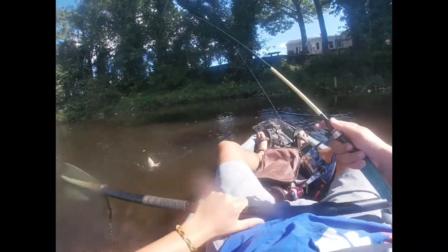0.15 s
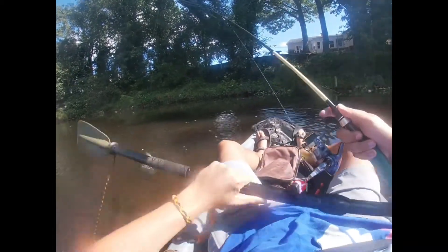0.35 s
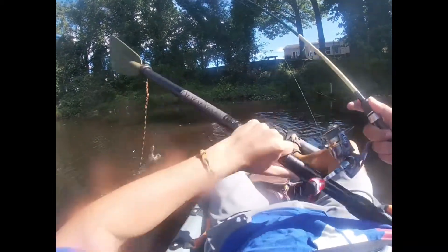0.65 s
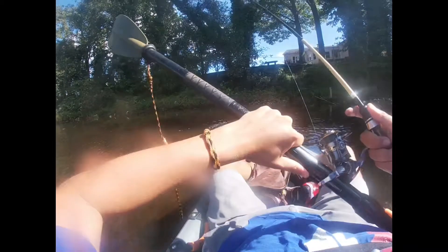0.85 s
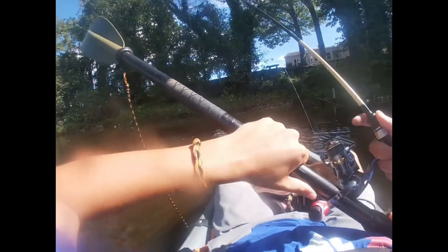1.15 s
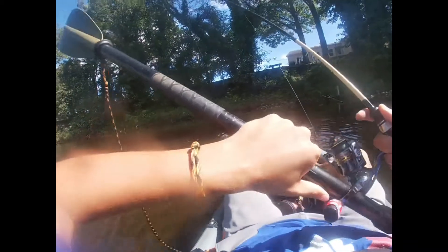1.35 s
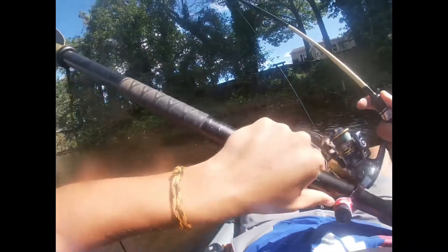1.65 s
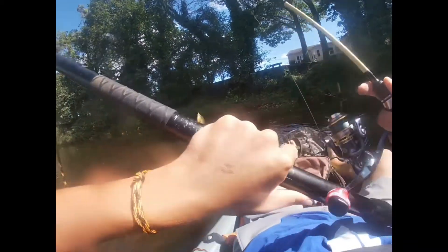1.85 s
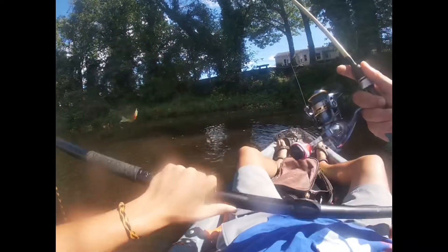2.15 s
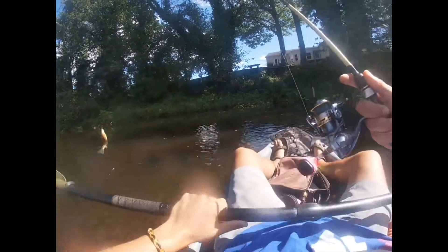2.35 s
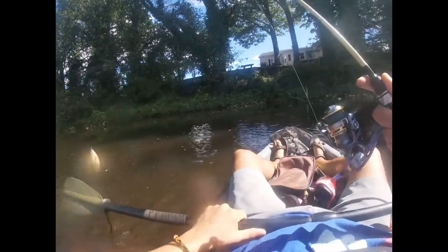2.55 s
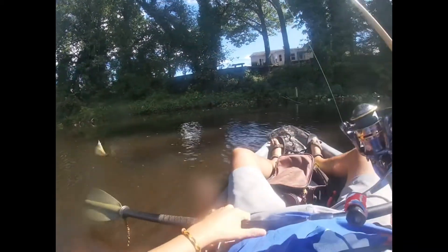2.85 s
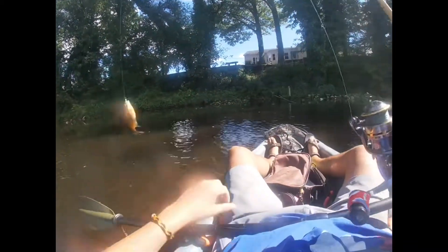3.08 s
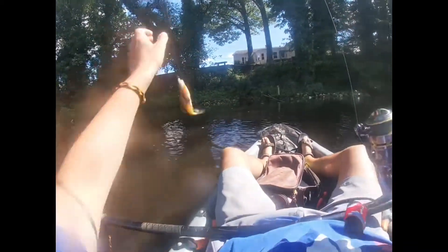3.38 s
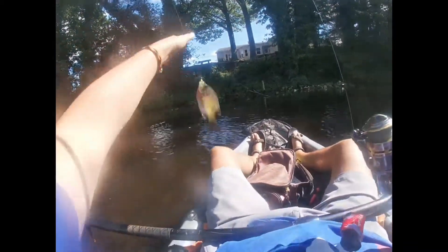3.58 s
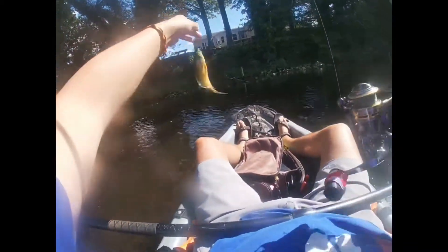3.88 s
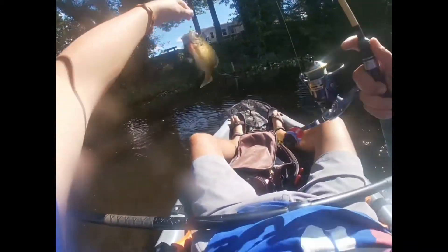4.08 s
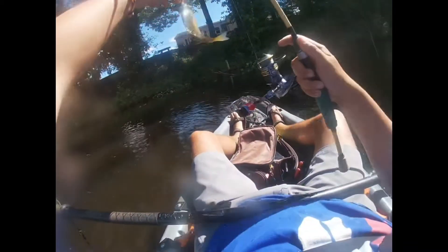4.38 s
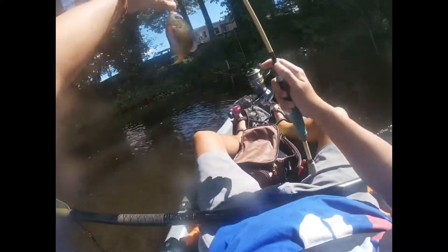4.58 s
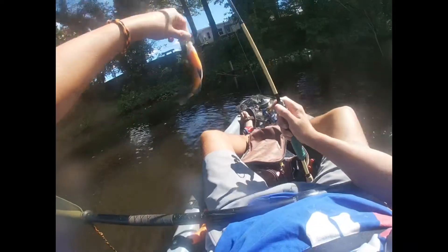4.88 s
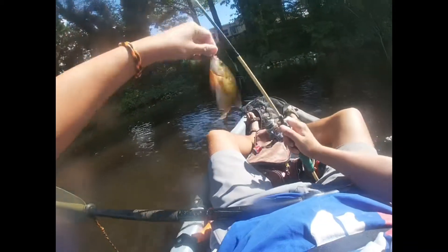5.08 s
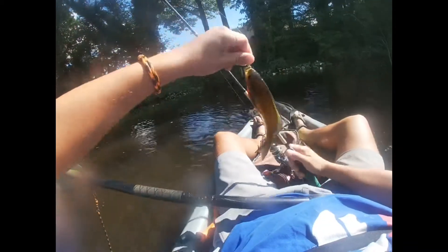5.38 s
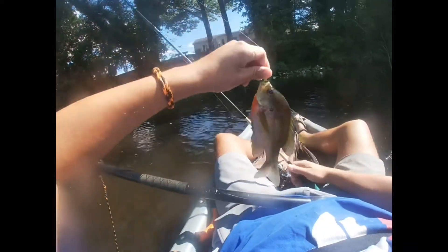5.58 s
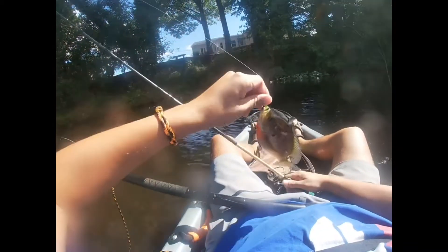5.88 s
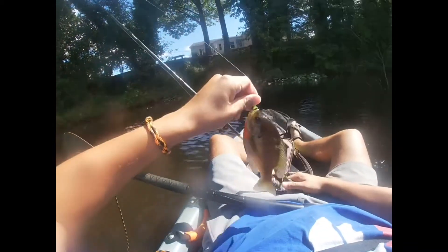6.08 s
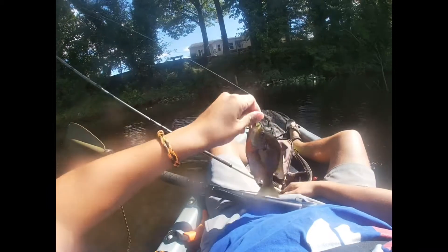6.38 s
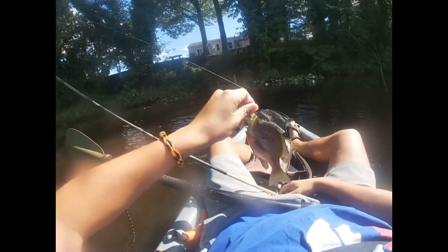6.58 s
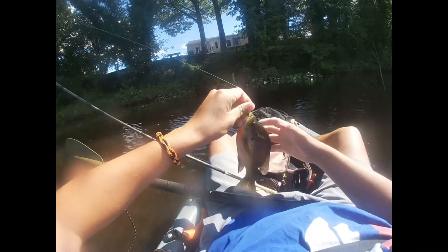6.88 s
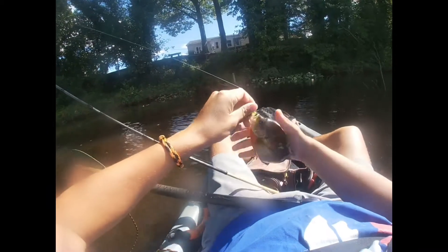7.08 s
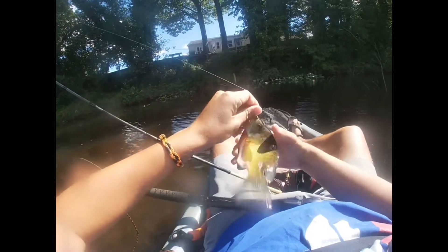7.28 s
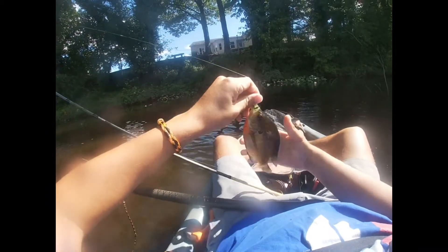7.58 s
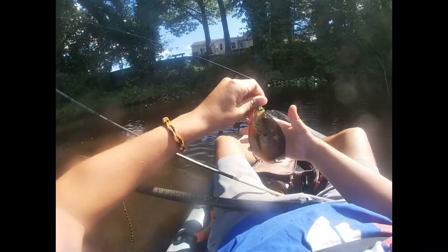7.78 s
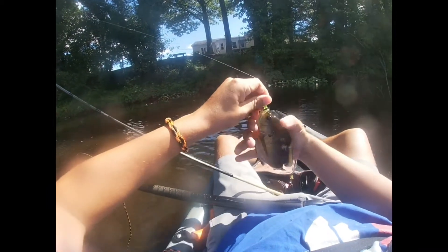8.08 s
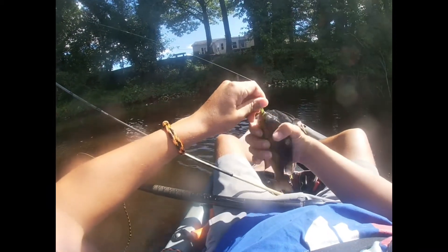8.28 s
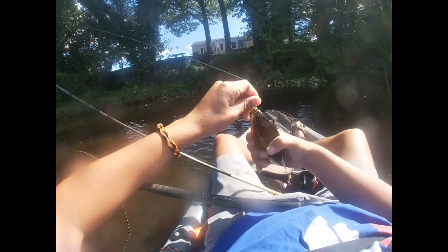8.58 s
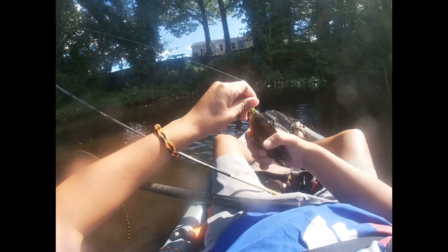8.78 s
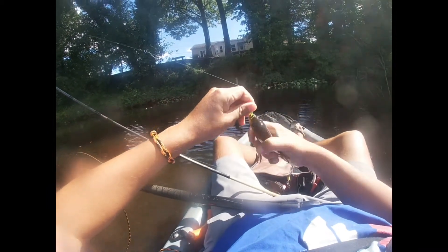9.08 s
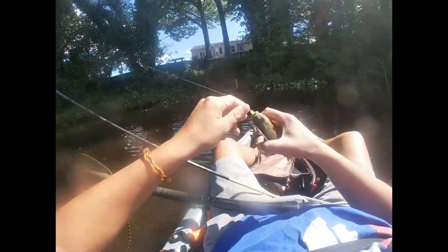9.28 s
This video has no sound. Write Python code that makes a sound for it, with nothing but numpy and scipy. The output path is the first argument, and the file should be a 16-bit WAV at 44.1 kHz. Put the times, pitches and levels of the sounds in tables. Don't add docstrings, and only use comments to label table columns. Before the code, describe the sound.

A kayak on a calm river, heard through one muffled microphone. Soft thumps, a sharp clicking of reel gear and small drips lead to a violent burst of scraping, thudding and low mount rumble near two seconds. Cloth rustles and nicks patter past three seconds and thin out; a rod creaks briefly, a wet slither and a few ticks follow over soft air, distant crickets and a faint electronic ticking hiss.

```python
import sys
import numpy as np
from scipy import signal
from scipy.fft import rfft, irfft, next_fast_len
from scipy.io import wavfile
from scipy.ndimage import uniform_filter1d

SR = 44100
rng = np.random.default_rng(int(sys.argv[2]) if len(sys.argv) > 2 else 0)


def field_ratio(decibels):
    return 10 ** (np.asarray(decibels, dtype=float) / 20)


def master(y):
    cut = np.clip(np.atleast_2d(y).T, -1, 1)
    pcm = np.round(cut * 32767)
    wavfile.write(sys.argv[1], SR, pcm.astype(np.int16))


N = 416304


def noise():
    return rng.standard_normal(N)


def clock(seconds):
    return np.arange(int(seconds * SR)) / SR


def rms_one(x):
    return x / np.sqrt(np.mean(x ** 2) + 1e-20)


def peak_one(x):
    return x / np.abs(x).max()


def decay(t, t60):
    return field_ratio(-60 * t / t60)


def in_time(rows, outside=None):
    s, *columns = np.transpose(rows)
    return [np.interp(np.arange(N) / SR, s, c, outside, outside) for c in columns]


def strokes(rows, attack, release):
    t, level = np.arange(0, N, 32) / SR, -120
    for s, hold, db in rows:
        before, after = np.maximum(s - t, 0), np.maximum(t - s - hold, 0)
        level = np.maximum(level, db - attack * before - release * after)
    return np.interp(np.arange(N) / SR, t, level)


def colour(x, spectrum):
    hz, db = np.transpose(spectrum)
    size = next_fast_len(N)
    f = np.log(np.fft.rfftfreq(size, 1 / SR) + 1e-3)
    knots = np.log(np.r_[hz[0] / 2, hz, hz[-1] * 2])
    gain = field_ratio(np.interp(f, knots, np.r_[db[0] - 40, db, db[-1] - 40]))
    return rms_one(irfft(rfft(x, size) * gain, size)[:N])


def band(x, lo_hz, hi_hz, order=2):
    return signal.sosfilt(signal.butter(order, [lo_hz, hi_hz], "band", fs=SR, output="sos"), x)


def drift(rate_hz):
    r = np.exp(-2 * np.pi * rate_hz / SR)
    return rms_one(signal.lfilter([1], [1, -2 * r, r * r], rng.standard_normal(N + SR))[SR:])


def ring(x, hz, t60):
    r, w = decay(1 / SR, t60), 2 * np.pi * hz / SR
    return signal.lfilter([0, np.sin(w)], [1, -2 * r * np.cos(w), r * r], x + 1e-18)


def ping(hz, t60, rise, t, sag=0, settle=0.0013):
    t = np.maximum(t, 0)
    shape = (1 - np.exp(-t / rise)) ** 2 * decay(t, t60)
    return shape / shape.max() * np.sin(2 * np.pi * hz * (t + sag * (1 - np.exp(-t / settle))))


def add(out, s, x):
    i = round(s * SR)
    out[i:i + len(x)] += x[:N - i]


# frequency in Hz, level in dB per Hz.
AIR = [(180, -26), (300, 0), (544, -5), (791, 4.5), (1050, -3), (1650, 10), (2020, 6), (2760, -10.5),
       (3960, -16), (5170, -11.5), (6140, -15.5), (8260, -38), (9220, -36), (10600, -26), (12000, -69),
       (16400, -100)]


def air():
    return field_ratio(-49.5 + 0.87 * drift(22)) * colour(noise(), AIR)


# pitch in Hz, chirps per second, time of one chirp in seconds,
# loudest moment in seconds, spread of the phrase in seconds, level in dB.
CRICKETS = [
    (5010, 8.8, 6.35, 6.6, .9, -48.5),
    (5370, 9.5, 6.3, 6.6, .55, -49.5),
    (5020, 9.6, 8.97, 9.0, .9, -51.5),
    (5030, 9.0, 2.817, 2.0, 2.0, -51),
]


def crickets():
    t = np.arange(N) / SR
    out = field_ratio(-59.5) * rms_one(ring(noise(), 5020, .02))
    out += field_ratio(-60) * rms_one(ring(noise(), 5330, .009))
    for hz, per_s, at, loudest, spread, db in CRICKETS:
        gate = np.clip(np.cos(2 * np.pi * per_s * (t - at)) - .6, 0, 1) / .4
        phrase = field_ratio(db + 1.5 * drift(3)) * np.exp(-.5 * ((t - loudest) / spread) ** 2)
        out += gate * phrase * np.sin(2 * np.pi * hz * t + .9 * drift(40))
    return out


def frame_ticks():
    frame_hz = 30
    s = np.arange(1, int(N / SR * frame_hz)) / frame_hz
    late, strength = rng.standard_normal((2, len(s)))
    clicks = np.zeros(N)
    clicks[((s - .001 + .0035 * late) * SR).astype(int)] = field_ratio(2 * strength)
    puffs = .2 + signal.lfilter([1], [1, -decay(1 / SR, .03)], clicks)
    return field_ratio(-67) * rms_one(band(puffs * noise(), 5800, 8700, order=8))


# time in seconds, slip rate in Hz, level in dB.
CREAK = [
    (5.26, 768, -76),
    (5.28, 749, -48),
    (5.31, 722, -54),
    (5.34, 766, -47),
    (5.36, 725, -62),
]


def creak():
    hz, db = in_time(CREAK)
    phase = 2 * np.pi * np.cumsum(hz) / SR
    on = in_time([(CREAK[0][0], 1), (CREAK[-1][0], 1)], outside=0)[0]
    return on * field_ratio(db) * (field_ratio(-7) * np.sin(phase) + np.sin(2 * phase) + field_ratio(-7) * np.sin(3 * phase))


# time in seconds, level in dB, pitch in Hz.
DROPS = [(0.616, -31, 3510), (0.6972, -42, 3520), (1.1278, -43, 2530), (1.591, -33, 3040),
         (2.7357, -32.5, 2440), (2.7875, -40, 2580), (2.923, -38.5, 2570), (3.02, -47, 3360),
         (3.3776, -41, 3380), (3.9533, -43, 3020), (4.08, -31, 3540), (8.883, -40, 3500),
         (9.066, -45, 3380), (9.083, -39, 3380)]


def drops():
    out, t = np.zeros(N), clock(1 / 40)
    for s, db, hz in DROPS:
        add(out, s, field_ratio(db) * ping(hz, 0.017, 0.00037, t))
    return out


# time in seconds, level in dB, pitch in Hz, 60 dB decay in seconds.
BUMPS = [(.005, -36, 165, 0.16), (0.075, -29, 103, 0.086), (0.689, -30, 92, 0.088), (.87, -16.5, 87.5, 0.1),
         (1.929, -22, 266, 0.084), (1.965, -8.5, 85.4, 0.072), (2.022, -15, 120, 0.1),
         (2.14, -21.5, 305, 0.13), (2.269, -20, 90.6, 0.2), (2.173, -15, 70.6, 0.11),
         (2.155, -17, 138, 0.097), (5.103, -35, 188, 0.14), (6.294, -32, 342, 0.061),
         (6.305, -37.5, 427, 0.04), (6.333, -36, 202, 0.036)]


def bumps():
    out, t = np.zeros(N), clock(1 / 5)
    for s, db, hz, t60 in BUMPS:
        note = ping(hz, t60, 0.0041, t, sag=0.0013, settle=0.012)
        if hz > 280:
            lumps = rng.standard_normal(len(t)) * decay(t, 2.6 * t60)
            note = .5 * note + peak_one(band(lumps, 0.67 * hz, 1.24 * hz))
        add(out, s, field_ratio(db) * note)
    return out


# time in seconds, level in dB.
LID_BLOWS = [(.068, -28), (.156, -37), (0.684, -31.5), (0.863, -30), (1.178, -43), (1.556, -22),
             (2.942, -43), (3.153, -21.5)]


def lid():
    out, t = np.zeros(N), clock(1 / 8)
    for s, db in LID_BLOWS:
        add(out, s, field_ratio(db) * ping(822, 0.028, 0.00069, t))
    return out


# time in seconds, level in dB, final pitch in Hz.
BLOOPS = [
    (0.687, -40, 290),
    (.779, -32.5, 100),
    (.866, -35, 260),
    (2.127, -18.5, 411),
    (2.147, -23, 410),
]


def bloops():
    out, t, settle_s = np.zeros(N), clock(1 / 8), .018
    for s, db, hz in BLOOPS:
        fall = 1.4 * min(1, 260 / hz) ** 6
        note = ping(hz, 0.19, 0.0035, t, sag=fall * settle_s, settle=settle_s)
        hiss = rng.standard_normal(len(t))
        splash = sum(band(hiss * decay(t, 0.27 / k), k * hz, (k + 1) * hz) for k in (1, 2, 3))
        add(out, s, field_ratio(db) * (note + field_ratio(4) * peak_one(splash)))
    return out * field_ratio(3.5 * drift(59))


# time in seconds, level in dB, pitch in Hz.
PLOPS = [(0.865, -15, 130), (.808, -26, 140), (1.94, -9, 98), (2.0135, -7.5, 100), (2.1406, -7.5, 102),
         (0.966, -32, 170), (0.989, -29, 150), (3.1551, -18.5, 149), (0.373, -30, 172), (1.247, -26, 148),
         (1.445, -18.5, 156), (1.741, -17, 130), (2.628, -31, 167), (4.0, -34, 170), (4.295, -25, 205),
         (4.401, -26.5, 208), (4.595, -33, 183), (6.21, -25, 177), (7.955, -42, 170), (8.565, -31, 172),
         (8.687, -42, 170), (8.81, -26.5, 160), (8.91, -39.5, 172), (9.305, -23, 169)]
# time of the top in seconds, level in dB, rate in Hz.
SWINGS = [(0.088, -14, 12.3), (.752, -15, 25), (1.659, -19, 18), (.15, -27, 14), (1.985, -14, 22),
          (2.004, -10, 54), (2.035, -14.5, 27), (2.132, -12, 37), (3.716, -23.5, 17), (7.353, -22.5, 18.6),
          (2.073, -11, 53), (2.09, -8, 50), (2.119, -3.5, 25.4), (3.397, -21, 21), (4.448, -25, 25),
          (8.335, -25.5, 18), (9.422, -27.5, 20)]


def swings():
    out, t = np.zeros(N), clock(1 / 8)
    for s, db, hz in PLOPS:
        add(out, s, -field_ratio(db) * ping(hz, 0.03, 0.0023, t))
    t = t - t[-1] / 2
    for s, db, hz in SWINGS:
        fade = np.exp(-.5 * (t * hz / 0.46) ** 2)
        add(out, s + t[0], field_ratio(db) * np.cos(2 * np.pi * hz * t) * fade)
    return out


# time in seconds, level in dB.
MOTION = [(0, -41), (.55, -35), (.97, -35.5), (1.55, -35), (1.87, -27), (2.13, -16), (2.3, -28),
          (2.97, -50), (3.68, -32.5), (4.4, -40), (5.1, -38), (5.52, -47), (7.1, -46.5), (8.2, -46),
          (8.8, -42.5), (9.02, -51), (9.44, -40.5)]
# start in seconds, hold in seconds, heave in dB.
LURCHES = [(.18, 0.014, -26), (.75, 0.0075, -22.5), (.89, 0.026, -27.5), (1.62, 0.054, -27.5),
           (2.02, 0.017, -27), (2.12, 0.0067, -20), (3.2, 0.23, -30.5), (4.43, 0.014, -38),
           (7.35, 0.012, -32), (8.4, 0.095, -36.5), (9.36, 0.015, -32.5)]
# frequency in Hz, level in dB per Hz.
HEAVE = [(8, 2), (14, 6), (24, -1.5), (36, -10), (52, -11), (75, -55)]
MOUNT_HUM = [(70, -5), (100, -17), (130, -7), (175, -3.5), (230, -6), (300, -20.5), (420, -31.5)]


def mount():
    motion_db, = in_time(MOTION)
    heave_db = np.maximum(motion_db, strokes(LURCHES, attack=124, release=116))
    heave = colour(noise(), HEAVE)
    heave = heave / np.sqrt(uniform_filter1d(heave ** 2, size=SR // 8) + 0.016)
    hum = colour(noise(), MOUNT_HUM) * field_ratio(2.0 * drift(4.1))
    return field_ratio(heave_db) * heave + field_ratio(motion_db - 9.5) * rms_one(hum)


# start in seconds, hold in seconds, level in dB.
SLIDES = [(.07, 0.011, -43), (.26, .08, -51.5), (.41, 0.061, -41.5), (.58, 0.04, -48), (.95, .05, -58),
          (1.06, 0.02, -45.5), (1.2, 0.24, -48), (1.5, 0.17, -48), (2.42, 0.095, -41.5), (2.55, 0.02, -46),
          (3.64, 0.13, -47), (3.85, 0.14, -47), (4.07, 0.13, -50.5), (5.1, 0.066, -46.5),
          (5.2, 0.067, -50.5)]
# start in seconds, hold in seconds, level in dB.
SLITHER = [(6.305, 0.064, -46)]
# start in seconds, hold in seconds, level in dB.
SQUEAK = [(2.613, 0.058, -40)]
# frequency in Hz, level in dB per Hz.
SLIDE = [(240, -59), (400, -11), (610, -25), (997, 1), (1360, -0.5), (1600, 1.5), (1750, -13.5), (1910, 2),
         (2290, -30), (3040, -9.5), (4400, -27.5), (5720, -44), (9680, -120)]
WET = [(1300, -22), (1700, 2), (2100, 1), (2600, -11), (3000, -16.5), (3500, -8), (3900, -22)]


def sliding():
    shafts_db = strokes(SLIDES, attack=85, release=155) + 2.0 * drift(44)
    fish_db = strokes(SLITHER, attack=660, release=55) + 1.8 * drift(60)
    palm_db = strokes(SQUEAK, attack=2700, release=220)
    wet = noise()
    palm = field_ratio(palm_db) * rms_one(band(wet, 1400, 2200, order=3))
    return field_ratio(shafts_db) * colour(noise(), SLIDE) + field_ratio(fish_db) * colour(wet, WET) + palm


# time in seconds,
# level in dB, pitch in Hz.
NICKS = [(0.162, -29.5, 2500), (1.054, -29, 3380), (1.068, -34, 3470), (1.699, -26.5, 1250),
         (1.7315, -22, 3220), (1.858, -16, 890), (1.9067, -9, 3160), (2.078, -16, 920),
         (2.212, -18, 2590), (1.8208, -18, 3520), (2.4788, -19.5, 3260), (2.8355, -26, 2250),
         (2.9622, -37, 3660), (3.1517, -23, 3360), (3.1877, -36, 2240), (3.2024, -37, 3090),
         (3.2176, -33, 2630), (3.266, -22.5, 2270), (3.4016, -21, 2270), (3.462, -18, 2460),
         (3.4986, -14.5, 2300), (3.5575, -17, 2520), (3.578, -26, 2850), (3.8213, -15, 2380),
         (3.8264, -16, 2210), (3.8314, -25, 2260), (3.8536, -20, 2310), (3.9255, -37, 2270),
         (3.9734, -38, 2230), (4.2921, -26, 3630), (6.304, -30, 2200),
         (0.09, -31, 5060), (0.212, -33, 5010), (0.4479, -32, 5200), (0.609, -26, 5020),
             (0.7933, -3.5, 5400), (0.8084, -26, 5050), (1.6084, -26, 4900), (2.086, 4, 4830),
             (2.286, -13, 5250), (3.402, -23.5, 4900), (3.4406, -30, 5380), (3.458, -26, 5430),
             (3.5784, -28, 5370), (3.822, -20.5, 5360), (4.0228, -33, 5020), (4.2904, -33, 4810),
             (4.3014, -37, 4940), (7.2355, -30.5, 4730), (7.433, -34, 5030), (8.28, -35, 5140),
         (0.1201, -35, 6770), (0.4479, -45, 7890), (1.8707, 0, 7150), (1.9064, -7, 6750),
              (1.9634, -15, 7000), (2.156, -17, 6670), (2.273, -12.5, 8600), (2.3047, -17, 8030),
              (2.6125, -39, 6610), (2.6724, -42, 7330), (3.0051, -35, 8000), (3.8455, -35, 9200),
              (3.854, -35, 9200), (4.0248, -38, 6610), (6.325, -35, 6690), (8.2781, -41, 8450),
              (8.3729, -33, 6890), (8.553, -29, 7900)]


def nicks():
    out, t = np.zeros(N), clock(1 / 50)
    for s, db, hz in NICKS:
        t60 = 20 / hz
        pair = ping(0.95 * hz, t60, 0.0004, t) + ping(1.07 * hz, t60, 0.0004, t)
        add(out, s, field_ratio(db - 5) * peak_one(pair))
    return out


# time in seconds, dull rub in dB, bright rub in dB re dull.
DRAG = [
    (1.72, -56, -10),
    (1.793, -37, 1),
    (1.816, -24, 2),
    (1.89, -24, -1.5),
    (1.914, -14.5, -4),
    (2.134, -17, -1.5),
    (2.237, -35, 6.5),
    (2.366, -34, 1),
    (2.42, -49.5, -13),
]
# start in seconds, hold in seconds, dull rub in dB, bright rub in dB re dull.
BRUSHES = [(1.747, 0.013, -39.5, -0.5), (3.198, 0.1, -52, -3), (3.42, .05, -42, 3.5),
           (3.454, 0.066, -40.5, 5), (3.557, 0.04, -36, 4), (3.608, 0.034, -43.5, 6.5),
           (3.677, 0.055, -46.5, -5), (3.818, 0.035, -37.5, -1), (3.877, 0.11, -48, -2.5),
           (4.237, 0.047, -54.5, 12.5), (4.278, 0.059, -48, 8.5), (4.376, 0.035, -41, -5.5),
           (4.436, 0.015, -42.5, 4.5), (4.469, 0.11, -43.5, 2), (4.591, 0.031, -45.5, 2),
           (8.267, 0.03, -54, -9)]
# frequency in Hz, level
# in dB per Hz.
DULL_RUB = [(150, -50), (250, -1.5), (340, -8.5), (422, -8.5), (636, -10.5), (901, -2), (1120, -5.5),
            (1870, 3.5), (2340, -17), (2900, -36), (3770, -36), (6380, -120)]
BRIGHT_RUB = [(1290, -6.5), (2200, -15), (2600, -6.5), (3560, 1.5), (4180, -5.5), (4720, 3.5), (5810, -7),
              (6720, -6.5), (7160, -13), (8480, -10.5), (9190, -19.5), (10000, -15), (11000, -42),
              (11900, -28), (15000, -40)]
RETURN_RUB = [(1290, 3), (2200, -1.5), (2630, 1), (4080, -4), (5410, 3.5), (6000, -4), (8150, -12),
              (9300, -24.5), (10200, -18.5), (11200, -35), (15000, -34)]


def rubbing():
    slips = (rng.random(N) < 2500 / SR) * rng.choice([-1, 1], N)
    grains = rms_one(slips * field_ratio(3 * np.minimum(rng.exponential(1, N), 4)))
    clump_db = 1.2 * drift(25) + 2.5 * drift(206)
    dull = colour(noise() + 0.96 * grains, DULL_RUB) * field_ratio(clump_db + 1.9 * drift(33))
    fibres = noise() + 0.81 * grains
    eased = np.clip((np.arange(N) / SR - 2.15) / .03, 0, 1)
    bright = (1 - eased) * colour(fibres, BRIGHT_RUB) + eased * colour(fibres, RETURN_RUB)
    bright = bright * field_ratio(0.18 * clump_db + 1.07 * drift(21))
    drag_dull, drag_bright = in_time([(s, d, d + b) for s, d, b in DRAG], outside=-120)
    brush_dull = strokes([(s, h, d) for s, h, d, b in BRUSHES], attack=602, release=380)
    brush_bright = strokes([(s, h, d + b) for s, h, d, b in BRUSHES], attack=602, release=380)
    dull_gain = field_ratio(np.maximum(drag_dull, brush_dull))
    bright_gain = field_ratio(np.maximum(drag_bright, brush_bright))
    return dull_gain * rms_one(dull) + bright_gain * rms_one(bright)


def case_ring(hz, crack, t):
    rattle = band(crack * decay(t, .026), 0.755 * hz, min(1.3 * hz, 2050), order=4)
    wall = sum(ping(1780 + side_hz, 0.026, 0.0046, t) for side_hz in (-75, 75))
    body = field_ratio(2.5) * ping(hz, 0.0049, 0.0051, t) + field_ratio(-24.5) * ping(3430, 0.01, 0.00041, t)
    return body + field_ratio(-12) * peak_one(rattle) + field_ratio(-18) * wall


# pitch in Hz, level in dB, 60 dB decay in seconds.
CASE_MODES = [(406, -5.5, 0.018), (516, -17, 0.033), (831, -11.5, 0.049), (1250, -9.5, 0.025)]


def mount_thud(thud_db, t):
    chance = rng.standard_normal(5)
    soft_db = max(thud_db - 3.5, 0)
    thud = sum(field_ratio(db + 2 * c - soft_db) * ping(hz, t60, 0.00041, t)
               for (hz, db, t60), c in zip(CASE_MODES, chance))
    later = t - .0035
    push = ping(163 * (1 + 0.083 * chance[4]), 0.03, 0.002, later, sag=0.000096)
    return thud - push - .5 * ping(91.4, 0.032, 0.0043, later)


# pitch in Hz, level in dB, 60 dB decay in seconds.
SNAP_MODES = [(2610, -5, .004), (3500, -3, .003), (4900, 0, .0035), (5600, -3, .003), (6400, -2, .003),
              (7700, -6, .003)]


def snap(crack, t):
    burst = crack * decay(t, 0.017) + 4.7 * (t == 0)
    modes = sum(field_ratio(db + 2 * rng.standard_normal()) * ring(burst, hz, t60) for hz, db, t60 in SNAP_MODES)
    return peak_one(band(modes, 1400, 18000))


# time in seconds, case ring in dB, ring pitch in Hz, thud in dB re ring.
THUMPS = [(.066, -17.5, 1530, -3), (.192, -28.5, 1360, -11), (0.682, -27, 1580, 2.5), (1.07, -32, 1500, 0),
          (1.176, -17.5, 1250, 5), (1.243, -34, 1350, 12.5), (1.314, -32.5, 1390, 6.5),
          (1.446, -38.5, 1490, 8), (1.5544, -8.5, 1365, -2), (1.743, -40, 1630, 7), (2.789, -36, 1570, -1),
          (2.808, -21, 1360, 6.5), (2.941, -37.5, 850, 5.5), (3.549, -36, 1600, 8), (3.824, -27, 1630, 3),
          (4.096, -31.5, 1310, -1.5), (4.292, -28, 1780, -5), (4.399, -32.5, 1750, 0),
          (5.381, -47.5, 1600, 13.5), (5.977, -42, 1610, 10.5), (6.209, -38.5, 1070, 14.5),
          (6.291, -37, 950, -2), (6.308, -32, 1890, -3), (6.339, -29.5, 1900, -4), (8.416, -32, 1470, 3),
          (8.505, -52.5, 1760, 21), (8.805, -31.5, 1300, -3), (9.301, -24.5, 1410, -6)]
# time in seconds, case ring in dB, ring pitch in Hz.
TAPS = [(0.21, -32, 1720), (0.232, -33, 1310), (.383, -36, 2150), (0.833, -27.5, 1360),
        (2.495, -28.5, 1600), (2.614, -31, 1700), (2.628, -31, 1670), (2.642, -26.5, 1710),
        (2.736, -31, 1720), (2.835, -30.5, 1840), (2.915, -35.5, 1900), (3.265, -36, 1580),
        (3.28, -26.5, 1390), (3.403, -24, 1650), (3.463, -22.5, 1610), (3.499, -19.5, 1600),
        (3.408, -27, 1600), (3.457, -23, 1590), (3.575, -19.5, 1500), (3.595, -23, 1500),
        (3.606, -23, 1360), (4.259, -35, 1660), (4.519, -33, 1570), (0.22, -33, 1750), (1.601, -33, 1730),
        (1.633, -33, 1410), (1.908, -8.5, 1440), (1.93, -12, 1130), (1.963, -21, 1120), (1.989, -17, 1940),
        (2, -9.5, 960), (2.08, -11, 1840), (2.133, -15, 1660), (2.636, -29, 1870), (5.616, -39.5, 1760),
        (7.075, -39, 1700), (7.13, -36.5, 1730), (6.332, -36, 1910), (6.357, -35, 2050), (6.415, -37, 2040),
        (3.822, -19, 1650), (3.833, -25, 1540), (3.844, -23, 1580), (3.851, -24, 1520), (6.581, -40.5, 756),
        (7.483, -35, 1900)]
# time in seconds, case ring in dB, ring pitch in Hz, snap in dB re ring.
CLICKS = [(.156, -49, 890, -3), (.779, -8.5, 1940, 1.5), (.79, -20, 1810, 6), (.793, -21, 2070, -4),
          (.797, -20, 1770, 3), (.837, -14, 1890, 2.5), (1.032, -19, 1840, -5), (2.088, -4.5, 1910, 3),
          (2.658, -25, 1800, -11)]
TICKS = [(.932, -20.5, 1870, 1), (1.812, -14.5, 1935, -15), (2.342, -34, 1440, 10),
         (2.478, -21.5, 1340, -13), (3.1516, -3.5, 1400, -20.5), (3.251, -27, 1680, 2.5),
         (3.859, -23, 1780, -6), (3.9263, -21.5, 1580, 0.5), (7.308, -40, 1790, 6),
         (8.279, -33.5, 1860, -5), (8.365, -32.5, 1800, -20), (8.554, -23, 1790, -8.5)]
CATCHES = [(.611, -38.5, 2060, 2), (.861, -30, 1500, -12), (1.871, -25, 1820, 17), (1.901, -21.5, 1690, 20),
           (1.918, -17, 1320, 14.5), (2.212, -44, 1430, 0), (2.286, -28.5, 1680, 24),
           (2.357, -31.5, 1300, -17), (6.313, -46, 1870, 3)]


def blows():
    rows = [(s, db, hz, thud, -31 + 58 * np.log2(hz / 1500)) for s, db, hz, thud in THUMPS]
    rows += [(*tap, -10, -16) for tap in TAPS]
    for table, thud_db in ((CLICKS, -26), (TICKS, -9.5), (CATCHES, 4.5)):
        rows += [(s, db, hz, thud_db, snap_db) for s, db, hz, snap_db in table]
    return sorted(rows)


def knocks():
    out, t = np.zeros(N), clock(1 / 16)
    for s, ring_db, hz, thud_db, snap_db in blows():
        crack = rng.standard_normal(len(t))
        blow = case_ring(hz, crack, t) + field_ratio(thud_db) * mount_thud(thud_db, t)
        blow += field_ratio(snap_db + 0.5) * snap(crack, t)
        add(out, s, field_ratio(ring_db) * blow)
    return signal.sosfilt(signal.butter(4, 9800, fs=SR, output="sos"), out)


def scene():
    river = air() + crickets() + frame_ticks()
    kayak = creak() + drops() + bumps() + lid() + bloops() + sliding()
    case = swings() + mount() + nicks() + rubbing() + knocks()
    fade, = in_time([(0, .2), (.004, 1), (N / SR - .004, 1), (N / SR, 0)])
    mono = (river + kayak + case) * fade
    return np.array([mono, mono])


def roll_off(x):
    return signal.sosfilt(signal.butter(12, 15670, fs=SR, output="sos"), x)


# start in seconds, hold in seconds, level in dB.
SPLIT = (1.872, .05, -21)


def record(dry):
    parting = field_ratio(strokes([SPLIT], attack=9000, release=9000))
    error = parting * np.roll(band(dry[0], 4000, 15000, order=4), 300)
    error += field_ratio(-2) * np.roll(band(dry[0], 11800, 15000, order=6), 300)
    rounded = 1.03 * dry / (1 + np.abs(dry) ** 8) ** (1 / 8)
    return roll_off(np.clip(rounded + error * [[1], [-1]], -1, 1))


dry = scene()
out = record(dry)
master(out)
```